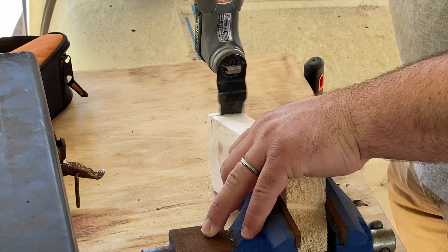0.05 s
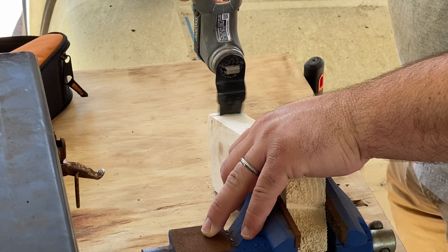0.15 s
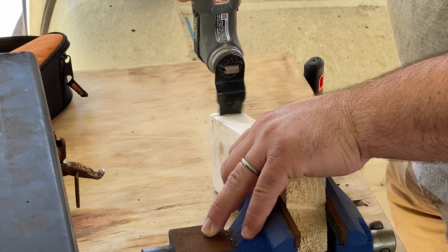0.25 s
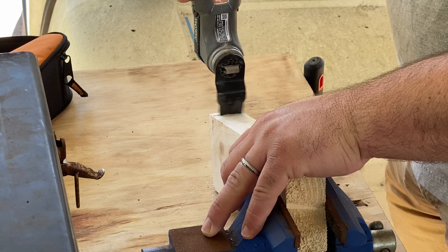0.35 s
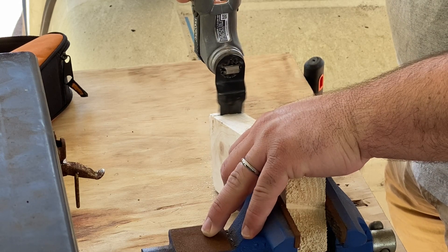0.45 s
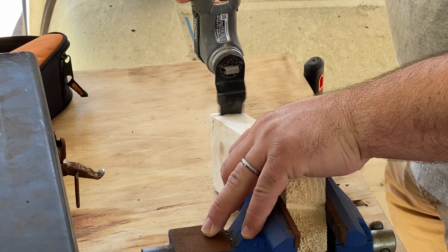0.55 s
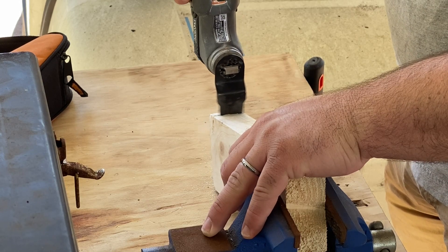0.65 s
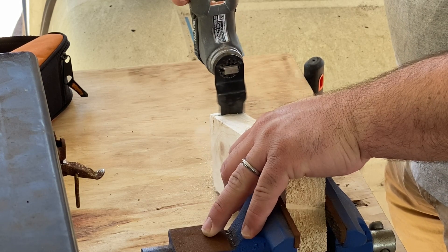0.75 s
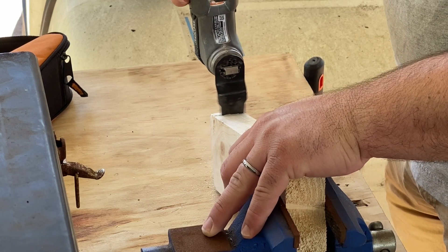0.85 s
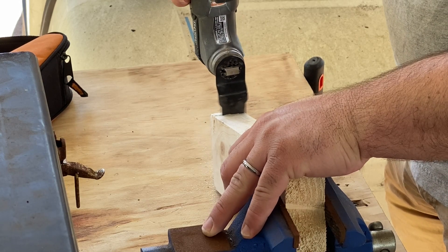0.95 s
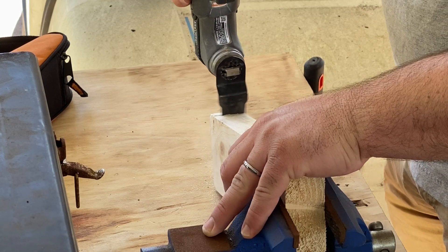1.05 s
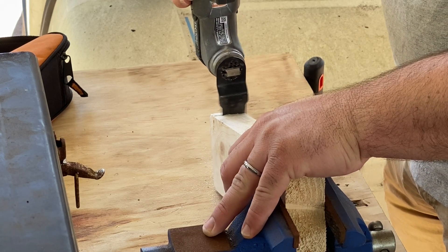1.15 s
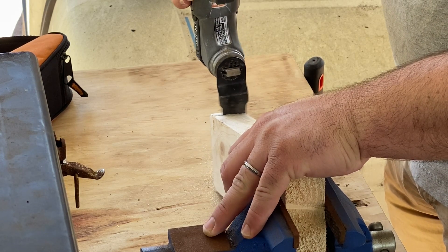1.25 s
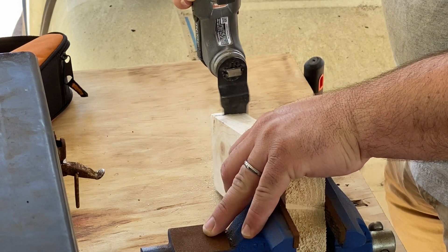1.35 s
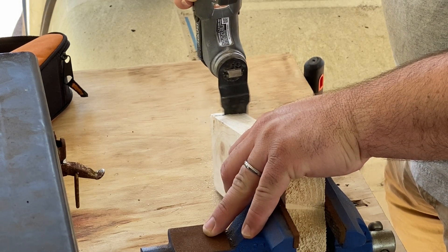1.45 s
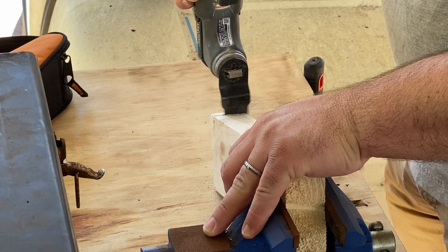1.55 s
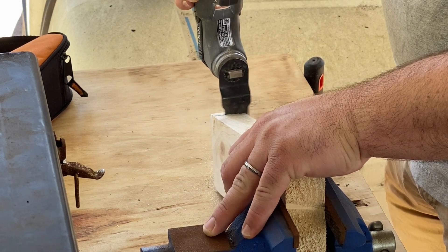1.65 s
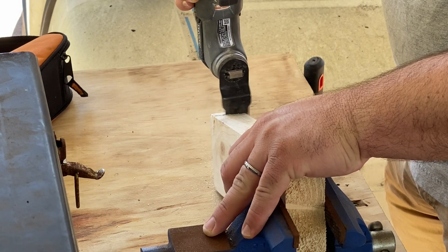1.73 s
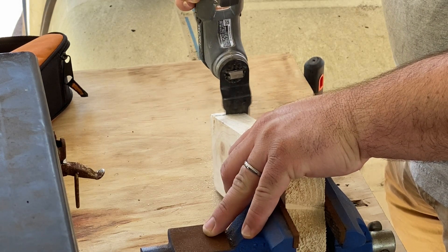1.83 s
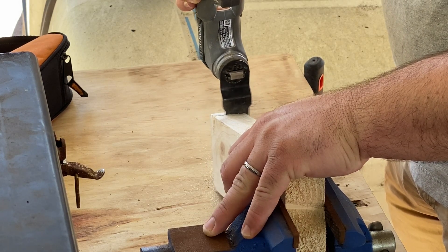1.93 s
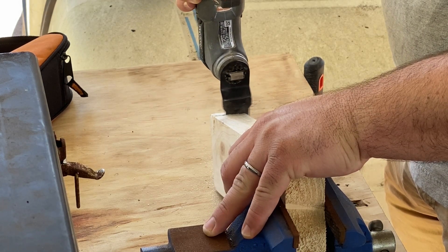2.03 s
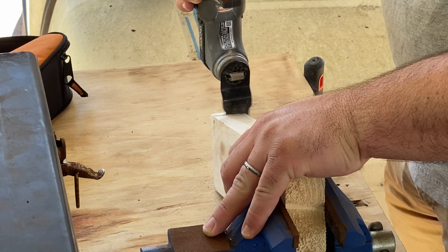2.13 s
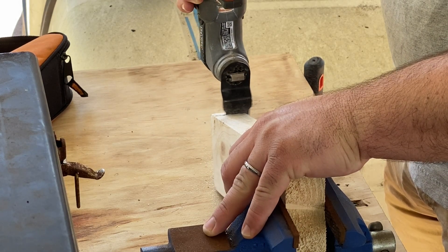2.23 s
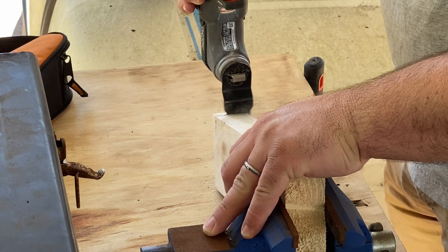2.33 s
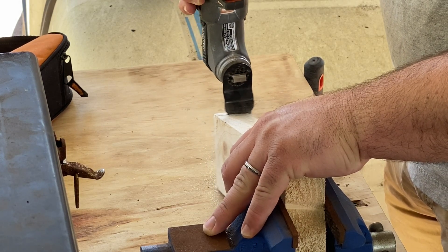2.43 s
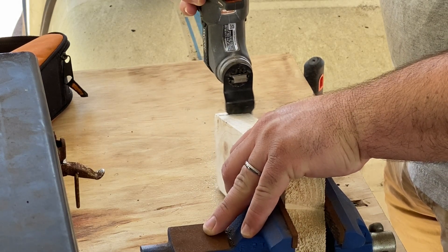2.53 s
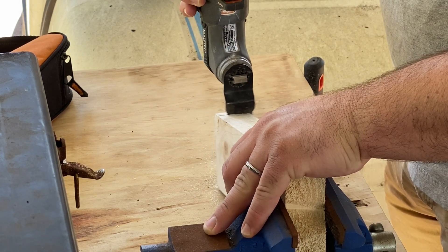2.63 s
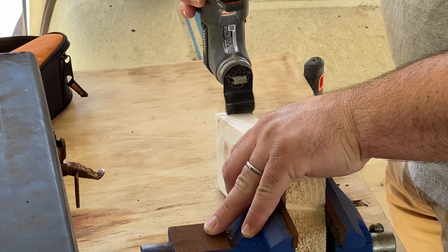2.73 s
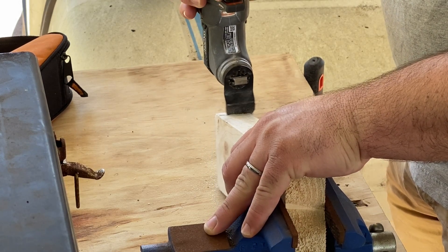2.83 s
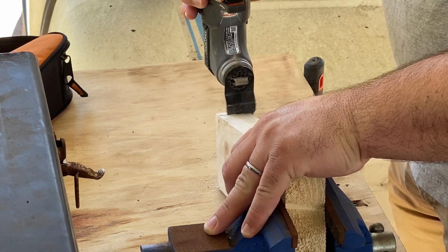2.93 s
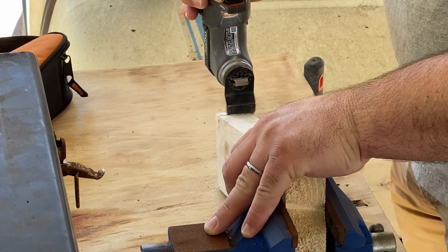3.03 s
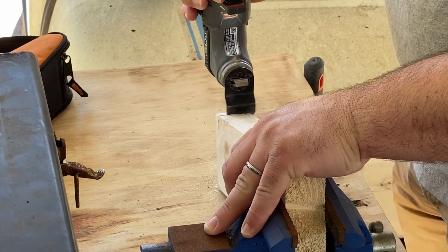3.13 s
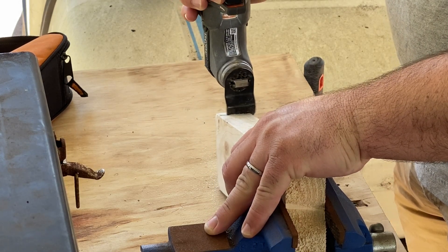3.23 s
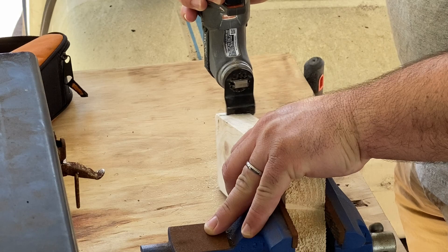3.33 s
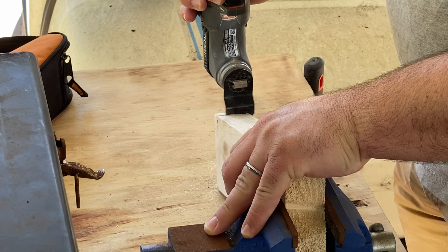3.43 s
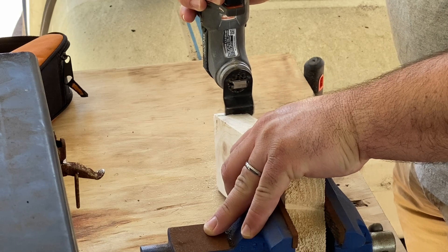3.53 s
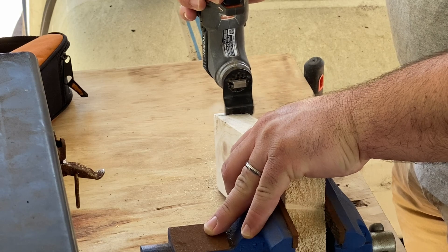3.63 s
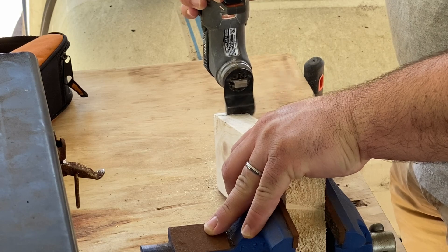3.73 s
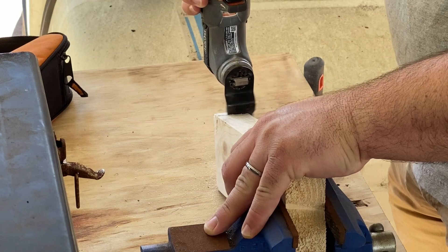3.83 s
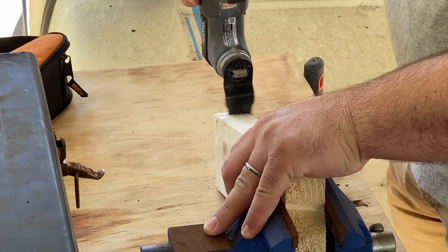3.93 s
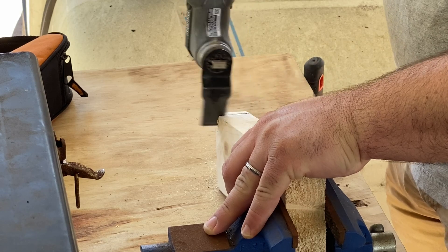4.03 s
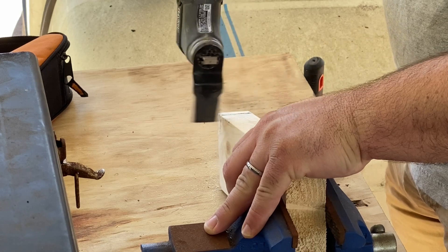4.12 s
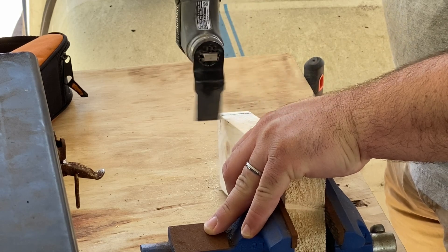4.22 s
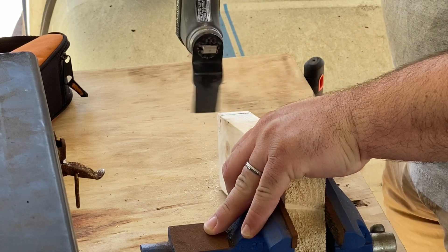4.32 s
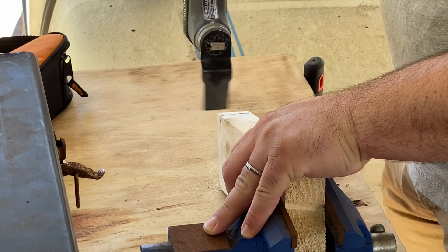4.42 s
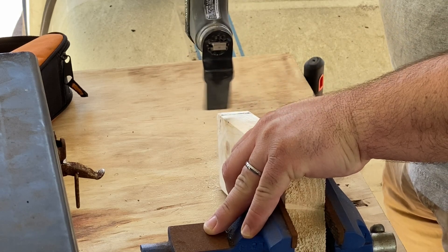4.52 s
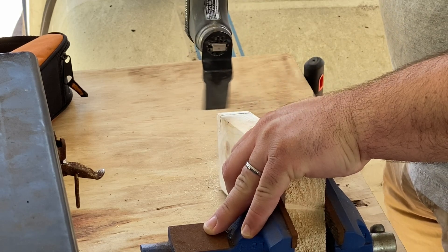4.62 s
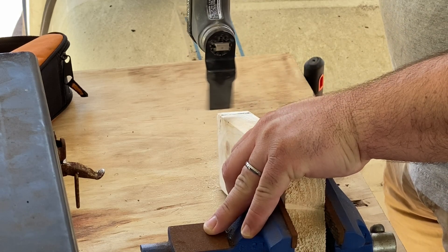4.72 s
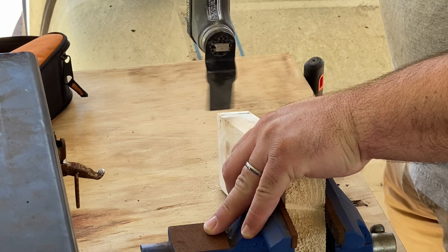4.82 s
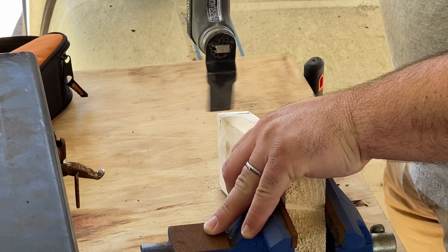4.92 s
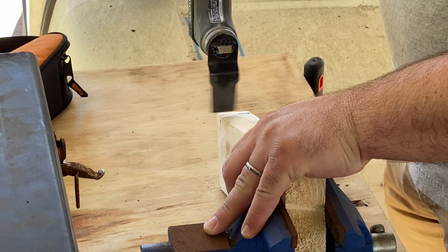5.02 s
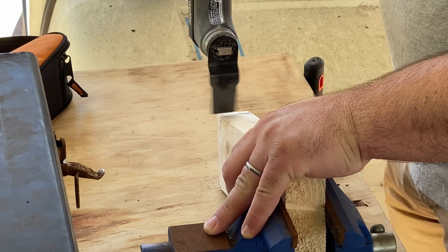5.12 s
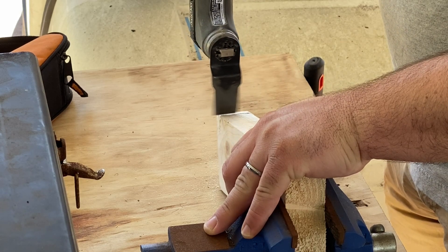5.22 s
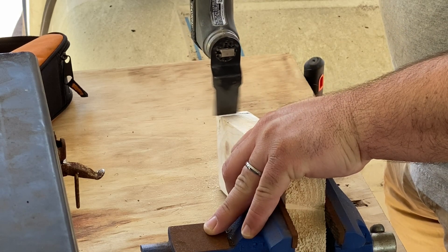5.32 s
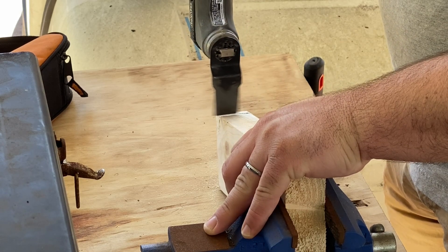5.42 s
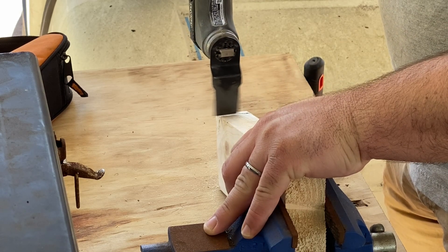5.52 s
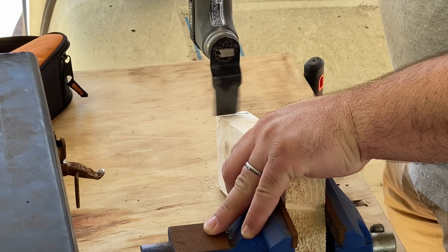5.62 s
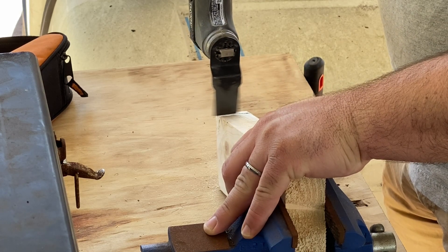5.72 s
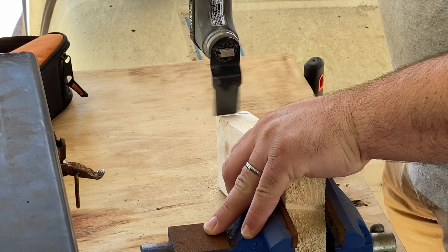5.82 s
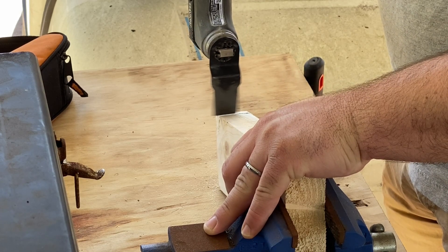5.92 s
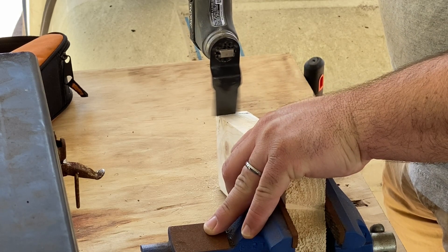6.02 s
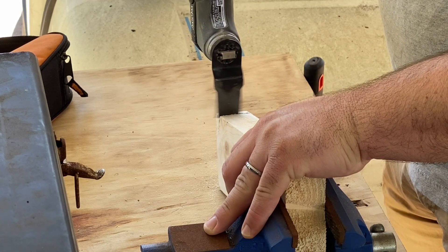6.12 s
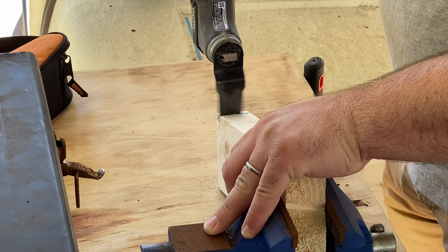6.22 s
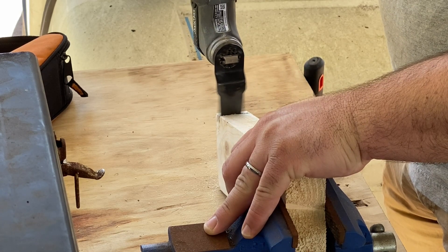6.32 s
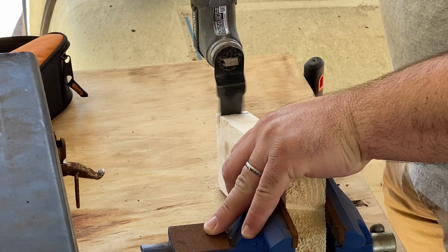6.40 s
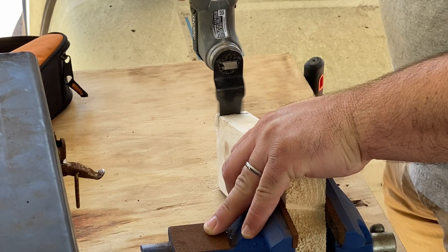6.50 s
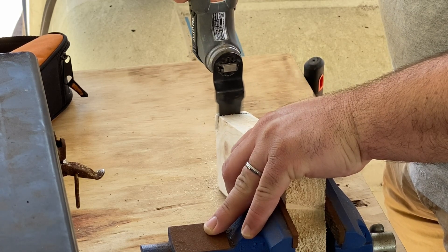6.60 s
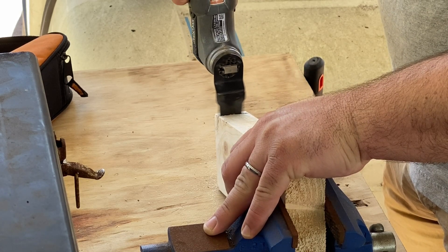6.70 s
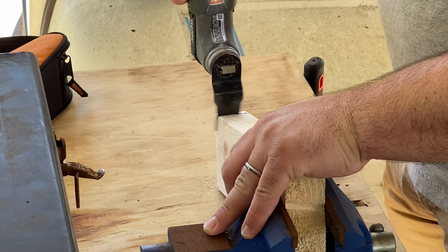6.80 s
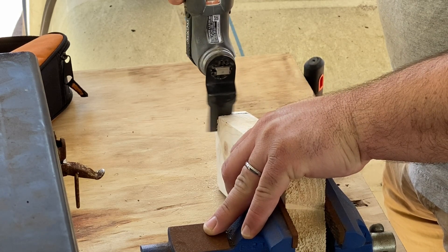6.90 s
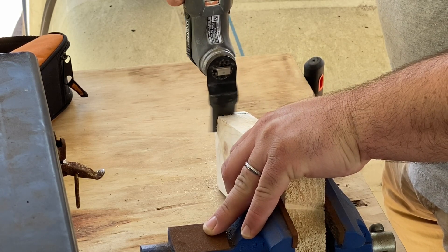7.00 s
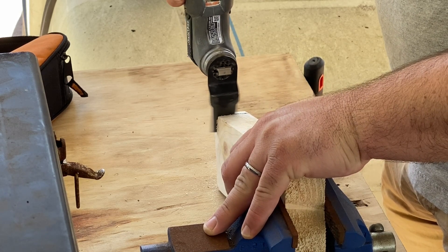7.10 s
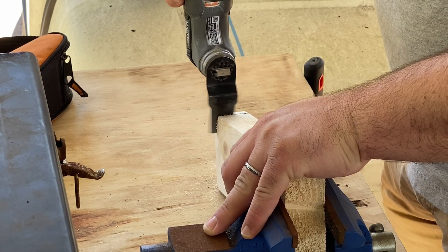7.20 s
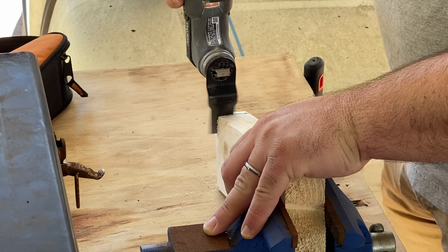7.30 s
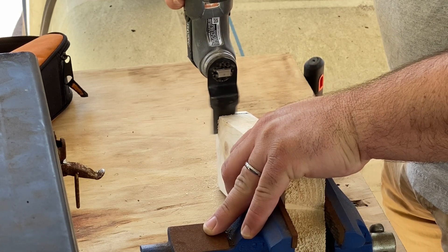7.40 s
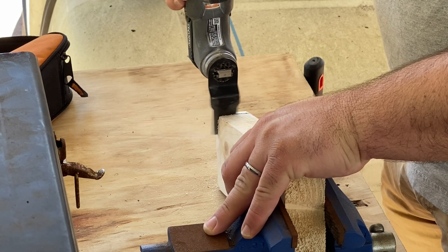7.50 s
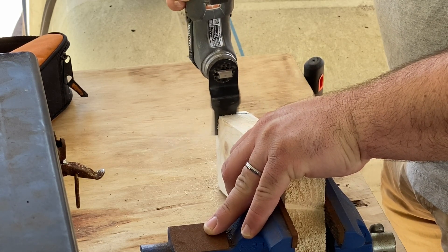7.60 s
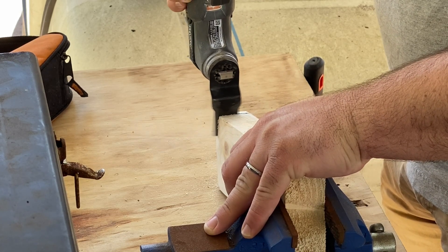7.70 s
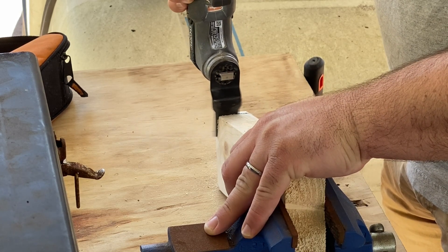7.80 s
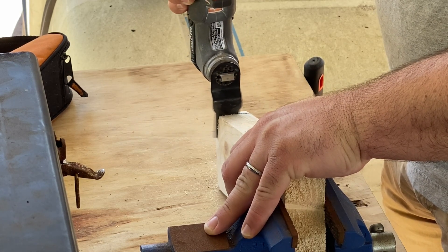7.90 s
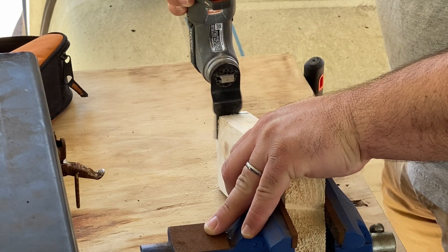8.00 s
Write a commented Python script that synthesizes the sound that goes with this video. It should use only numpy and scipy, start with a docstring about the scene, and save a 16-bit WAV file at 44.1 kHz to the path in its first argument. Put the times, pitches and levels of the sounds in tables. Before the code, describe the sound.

An oscillating power tool whines up and buzzes into a wood block, pulls out to run free, then cuts again.

```python
"""A corded oscillating multi-tool spins up and plunges into a wood block held in a vise on a bench.
The blade bites, sinks in, wedges and chatters, is pulled out, runs free and is set to the wood again.
Each stroke knocks out a bright buzz and rocks the block into a low hum; both sag in pitch under load.
The pinched blade squeals, the teeth rasp, the steel rings and the motor's fan hisses.
A short diffuse tail widens the noisy layers."""
import sys
import numpy as np
from scipy import signal
from scipy.fft import rfft, irfft, next_fast_len
from scipy.io import wavfile

SR = 44100
rng = np.random.default_rng(int(sys.argv[2]) if len(sys.argv) > 2 else 0)


def master_out(mix):
    """Clip the mix to full scale and print it as 16-bit PCM to the path in sys.argv[1]."""
    frames = np.transpose(np.atleast_2d(mix))
    ceiling = np.clip(frames, -1, 1)
    pcm = np.round(ceiling * 32767).astype(np.int16)
    wavfile.write(sys.argv[1], SR, pcm)


N = 355049
T = np.arange(N) / SR
FFT_SIZE = next_fast_len(N + 4096, True)
FREQS = np.arange(FFT_SIZE // 2 + 1) * SR / FFT_SIZE
MAINS_HZ = 60
MAINS_RIPPLE = np.sin(2 * np.pi * 2 * MAINS_HZ * T)  # two pushes on the motor per mains cycle
SIDES = np.array([[1], [-1]])  # left, right


# how hard the hand presses the blade into the wood: t/s, motor load/0-1
LOAD = [(0, .09), (.59, 0.23), (.69, .49), (.99, .635), (2.11, 0.72), (2.28, 0.95), (2.87, 0.94),
        (3.27, 0.86), (3.61, 0.6), (3.74, 0.27), (4.0, .23), (4.34, 0.06), (5.2, .1), (6.05, 0.05),
        (6.57, 0.22), (6.99, 0.06), (7.22, 0.15), (8.05, 0.46)]
def motor(start_hz=194.16, no_load_hz=321.46, sag_hz=49.89, inertia_s=.1):
    """Load, stroke rate and running stroke count: the rotor spins up and sags under load, with inertia."""
    load = np.clip(np.interp(T, *np.transpose(LOAD)), .01, 1)
    target_hz = no_load_hz - sag_hz * load
    pole = np.exp(-1 / (inertia_s * SR))
    hz = start_hz + signal.lfilter([1 - pole], [1, -pole], target_hz - start_hz)
    wobble = 1 + 0.001163 * wander(25) + 0.0014 * MAINS_RIPPLE
    return load, hz, np.cumsum(hz * wobble) / SR


# hand moves, each a crossfade centred on t; friction rides rasp and hiss, knock the buzz, rock the hum's
# fundamental, thrum its overtones; friction and rock drift as the kerf clogs or clears:
# t/s, fade/s, contact, blade engaged/0-1, friction/dB, knock/dB, rock/dB, thrum/dB, drift/(dB per s)
MOVES = [(0, .02, "biting", 0.81, 1, -2, 2, 8.5, 15.5), (.41, 0.21, "biting", 0.86, 0, 1, -6, -6, 11.5),
         (.66, 0.088, "biting", 0.87, 2, 1, 0, 2.5, -2), (.97, 0.23, "biting", 1, -1.5, -1, 2, -3.5, 3.5),
         (1.3, 0.36, "buried", 1, -0.2, 1, 1.5, 0, -2), (2.21, 0.065, "wedged", 0.98, 2, 0.5, 1.5, 0, 0),
         (2.88, 0.48, "wedged", 0.98, -4.5, -1, -4, -3, 1.5),
         (3.38, 0.19, "wedged", 1, -6, -1.5, -1.5, 2, 1.5),
         (3.72, 0.06, "biting", 0.78, -8, -13, -15, -7.5, -4.5),
         (4.33, 0.29, "free", 0, -0.5, 0.5, 4.5, 1.5, 0.5),
         (5.25, 0.055, "wedged", 0.19, -0.5, -1.5, 7.5, -0.5, -0.5),
         (6.05, 0.32, "free", 0, 2, 0.5, 6, -0.5, -8), (6.45, 0.31, "biting", 0.57, -4, -6.5, -2, -2, 0.5),
         (6.87, 0.082, "buried", 0.47, -2, -2, 2, -1, -1.5),
         (7.35, 0.17, "biting", 1, -6, -5.5, -6.5, -2, 3), (7.95, 0.39, "buried", 0.86, 0, 2, 4, -2, 10)]
# the teeth catch and jolt the block: t/s, half-width/s, knock/dB, rock/dB
CATCHES = [(3.95, 0.033, 4, 10), (4.08, .02, -2, 14), (5.373, 0.013, -2, 6), (6.629, 0.049, 2.5, 1),
           (6.913, 0.014, 1.5, 19)]
def hand(stutter_db=3, stutter_hz=22):
    """The hand sets the blend of contacts and four level rides in dB; a half-engaged blade stutters."""
    times, state = T[::64], None
    for t, fade_s, contact, engaged, friction_db, knock_db, rock_db, thrum_db, drift_rate in MOVES:
        drift = drift_rate * (times - t)
        blend = [engaged * (name == contact) + (1 - engaged) * (name == "free") for name in CONTACTS]
        rides = friction_db + drift, knock_db, rock_db + drift, thrum_db
        target = np.array(np.broadcast_arrays(*blend, *rides))
        crossfade = np.clip((times - t) / fade_s + .5, 0, 1)
        state = target if state is None else state + (target - state) * crossfade
    *blend, friction, knock, rock, thrum = (np.interp(T, times, row) for row in state)
    for t, half_width_s, knock_db, rock_db in CATCHES:
        jolt = swell(t, half_width_s)
        knock, rock = knock + knock_db * jolt, rock + rock_db * jolt
    blend = np.clip(blend, 0, 1)
    free = blend[0]
    stutter = stutter_db * 2 * np.sqrt(free * (1 - free)) * wander(stutter_hz)
    return blend, friction, knock, rock + stutter, thrum + stutter / 2


# buzz EQ, one curve per contact (free, biting, buried, wedged): f/Hz, level/dB
BUZZ_EQ = ([(1270, -11.5), (1590, -3.5), (1900, -0.5), (2220, -8.5), (2540, -7), (2860, 3), (3490, -14.5),
           (4120, -8), (4760, -6.5), (5710, 0.5), (6340, 6), (6980, -14), (7610, -2), (12690, -1)],
           [(1220, -4), (1530, -3.5), (1840, -3.5), (2140, -5), (2450, 3.5), (2750, -7.5), (3370, -3),
           (3980, -7), (4590, -3.5), (5510, -1), (6120, -2), (6730, -12.5), (7650, -3), (12240, -15)],
           [(1150, -0.5), (1440, 6), (1730, -3), (2020, -10), (2300, 3.5), (2590, 0), (3170, -3.5),
           (3750, -6), (4320, -3), (4900, -8), (5760, 2.5), (6630, -16.5), (7200, -7.5), (11520, -3)],
           [(1110, 0.5), (1380, 0.5), (1660, -6), (1940, 5.5), (2490, 5.5), (2770, -1), (3050, -5.5),
           (3880, -3), (4710, 0), (5260, -3), (5810, -13), (6370, -6.5), (7200, -1), (11070, -7)])
# play in the drive and grip, per contact: half-speed rattle level/dB, harmonic flutter/dB
LOOSENESS = [(-5.5, 2), (-15, 9), (-5.5, 1.5), (-9, 2.5)]
def stroke_buzz(strokes, stroke_hz, contact_blend, flutter_hz=12, full_rattle_hz=5000):
    """A knock on each stroke gives a tall harmonic stack; slack in the drive adds lines in between."""
    times, hz, blend = T[::256], stroke_hz[::256], contact_blend[:, ::256]
    rattle_db, flutter_db = np.transpose(LOOSENESS)
    stack, power, knock_phase = 0, 0, 0
    for order in np.arange(4, 44, .5):
        colour = sum(share * eq(curve, order * hz) ** 2 for share, curve in zip(blend, BUZZ_EQ))
        grip = np.minimum(wander(flutter_hz, times), 1)  # grip and pressure keep shifting
        gain = np.sqrt(colour + 1e-12) * undb(flutter_db @ blend * grip)
        if order % 1:  # a rattle line
            gain *= (undb(rattle_db) @ blend) * np.minimum(order * hz / full_rattle_hz, 1)
            phase = rng.uniform(0, 2 * np.pi)
        else:
            knock_phase += np.pi / 2 * rng.standard_normal()  # the housing spreads each knock in time
            phase = knock_phase
        stack += np.interp(T, times, gain) * np.cos(2 * np.pi * order * strokes + phase)
        if order < 26:  # these lines set the overall level
            power += gain ** 2 / 2
    throb = 1 + 0.055 * MAINS_RIPPLE
    roughness = undb(0.28 * wander(330))
    return stack / np.sqrt(np.interp(T, times, power)) * throb * roughness


def block_hum(strokes, hz, levels_db, flutter_db=0.46):
    """The blade's reaction rocks block and bench: low harmonics that sweep through the bench modes."""
    hum = 0
    for order, db in enumerate(levels_db, 1):
        gain = np.sqrt(2) * undb(db + order * flutter_db * wander(60)) * bench_gain(order * hz)
        hum += gain * np.sin(2 * np.pi * (order * strokes + rng.random()))
    return hum * (1 + 0.032 * MAINS_RIPPLE)


# under pinch or load, one mode of blade or block sings out: t/s, half-width/s, f/Hz, bandwidth/Hz, level/dB
SQUEALS = [(0.13, 0.018, 2320, 270, -22.5), (0.26, 0.099, 3800, 220, -32), (0.44, 0.12, 6000, 160, -30.5),
           (0.534, 0.066, 2830, 530, -32.5), (.52, .06, 6320, 300, -27), (1.35, 0.065, 6500, 600, -26.5),
           (2.53, 0.38, 2240, 450, -38), (2.6, 0.49, 4640, 270, -32), (2.6, 0.22, 5900, 400, -30),
           (3.34, 0.24, 4620, 170, -34.5), (3.526, 0.064, 1990, 150, -43), (3.52, 0.2, 2555, 190, -33.5),
           (3.56, 0.079, 7220, 350, -38), (4.36, 0.055, 10440, 140, -33.5), (5.807, .55, 6200, 299.1, -48),
           (5.62, 0.22, 477, 23, -53.5), (6.98, 0.061, 1267, 120, -49), (8.2, 0.079, 2380, 120, -45),
           (7.973, 0.13, 3340, 199.7, -37.5)]
def squeals(buzz, friction_db=-3):
    """Knocks and friction drive the modes; harmonics flare as they glide through a resonance."""
    force = rfft(buzz + undb(friction_db) * rng.standard_normal(N), FFT_SIZE)
    voices = 0
    for t, half_width_s, hz, width_hz, db in SQUEALS:
        ring = irfft(force * resonance(hz, width_hz) ** 2, FFT_SIZE)[:N]
        pinch = swell(t, half_width_s)
        ring_rms = np.sqrt(np.average(ring ** 2, weights=pinch))
        voices += undb(db) * pinch * ring / ring_rms
    return voices * (1 + 0.05 * MAINS_RIPPLE)


# rasp EQ, one curve per contact (free, biting, buried, wedged): f/Hz, level/dB
RASP_EQ = [
    [(60, -15), (130, -17.5), (400, -33), (850, -10), (1300, -14), (2200, -8), (3800, -12), (5500, -9.5),
     (6250, -1), (6900, -2.5), (7700, 0.5)],
    [(60, -12), (130, -7.5), (200, -4.5), (420, -11.5), (900, -6), (2400, -0.5), (3900, -3), (5000, 0),
     (6300, 0), (7800, 6.5)],
    [(60, -20), (130, -5), (190, 4), (330, -6), (750, -4), (1400, -3), (2400, 1), (3600, -4), (5500, 0),
     (7000, 1), (7800, 4.5)],
    [(60, -24), (130, -12), (200, -4), (340, -6), (520, -7), (1550, -6.5), (2400, -3.5), (3050, -8.5),
     (4200, -5.5), (4650, -4), (5150, 1), (5800, 1), (6500, -7), (7400, -2)],
]
def tooth_rasp(strokes, blend, low_hz=60, top_hz=8200, body_hz=700):
    """Teeth tear fibres and the gear rubs; kerf, block and bench colour the noise."""
    low_cut = FREQS ** 3 / (FREQS ** 3 + low_hz ** 3)
    high_cut = 1 / (1 + (FREQS / top_hz) ** 16)
    tone = low_cut * high_cut * bench_gain(FREQS)
    grit = sum(np.sqrt(share) * noise(eq(curve, FREQS) * tone) for share, curve in zip(blend, RASP_EQ))
    body = filtered(grit, 1 / (1 + (FREQS / body_hz) ** 4))  # low resonances ring through the strokes
    return body + (grit - body) * stroke_pulse(strokes, depth=0.069, uneven_db=0)


# ring of the steel per contact (free, biting, buried, wedged): level/dB against the hiss
RING_LEVELS = [-22, -22, -11, -9]
def blade_ring(blend, hz=10350, width_hz=65, flicker_db=3):
    """The thin steel blade sings where the kerf rubs it."""
    ring = noise(resonance(hz, width_hz))
    return ring * (undb(RING_LEVELS) @ blend) * undb(flicker_db * wander(24.45))


# the blade kicks, jams or clips the block's edge: t/s, half-width/s, scrape level/dB, thump level/dB
KICKS = [(0.021, 0.0084, -44, -30), (2.262, 0.019, -37, -33.5), (2.829, .025, -42, -36),
         (4.093, .004, -28.5, -50), (4.102, 0.0056, -51, -33), (4.175, 0.0093, -24.5, -46),
         (4.201, 0.0062, -34, -42), (5.24, 0.018, -36, -54), (6.912, 0.0076, -30, -46)]
# EQ of the bright scrape and of the dull thump: f/Hz, level/dB
SCRAPE_EQ = [(300, -15), (900, -4), (1500, -3), (2800, 4), (4500, 1), (7500, 5), (9500, -10), (15000, -19)]
THUMP_EQ = [(50, -31), (130, -5), (220, -1), (400, -12), (1000, -9), (3000, -41)]
def blade_kicks(strokes):
    """Brief hits of blade on wood, each a scrape layered with a thump."""
    scrape = noise(eq(SCRAPE_EQ, FREQS)) * stroke_pulse(strokes, depth=0.39, uneven_db=0.5)
    thump = noise(eq(THUMP_EQ, FREQS))
    return sum(swell(t, half_width_s) * (undb(scrape_db) * scrape + undb(thump_db) * thump)
               for t, half_width_s, scrape_db, thump_db in KICKS)


# airy top end of fan and dust: f/Hz, level/dB
HISS_EQ = [(6500, -31), (8200, -4.5), (10000, -2), (11500, -4.5), (13000, -4.5), (15500, -2.5)]
def fan_hiss(strokes):
    """Air from the fan and the spray of dust hiss, pulsing lightly with the strokes."""
    low_cut = FREQS > HISS_EQ[0][0]
    return noise(eq(HISS_EQ, FREQS) * low_cut) * stroke_pulse(strokes, depth=0.066, uneven_db=1.25)


# modes of bench and vise: f/Hz, bandwidth/Hz, level/dB against the sound driving them
BENCH_MODES = [(126.4, 4.2, 8.5), (193.5, 15, 6), (483, 10, 9)]
def bench_gain(hz):
    """Lift that the resonating bench and vise give to each frequency."""
    modes = (undb(db) * resonance(mode_hz, width_hz) for mode_hz, width_hz, db in BENCH_MODES)
    power = 1 + sum(abs(mode) ** 2 for mode in modes)
    return np.interp(hz, FREQS, np.sqrt(power))


# EQ of the stereo width of the rasp and hiss, wide in the low mids and top treble, mono from 2 to 8 kHz:
# f/Hz, side level/dB against the centre
WIDTH_EQ = [(100, -25), (330, -6.5), (600, -7), (1300, -1), (2100, -35), (7500, -99), (9000, -2.5),
            (15000, -10.5)]
def stereo_width(x, t60_s=0.088):
    """A short diffuse tail, used as a side signal to spread the noisy layers."""
    tail = rng.standard_normal(N) * np.exp(-np.log(1000) * T / t60_s)
    smear = np.exp(1j * np.angle(rfft(tail, FFT_SIZE)))
    return filtered(x, smear * eq(WIDTH_EQ, FREQS))


def stroke_pulse(strokes, depth, uneven_db):
    """Envelope of friction that swells once a stroke, with optional random roughness."""
    return unit((1 + depth * np.cos(2 * np.pi * strokes)) * undb(uneven_db * wander(400)))


def swell(t, half_width_s):
    """Bell-shaped envelope peaking at time t."""
    return np.exp(-.5 * ((T - t) / half_width_s) ** 2)


def wander(rate_hz, times=T):
    """Random modulator with a spread near 1."""
    return 1.2 * np.interp(times * rate_hz, np.arange(4096), rng.standard_normal(4096))


def resonance(hz, width_hz):
    """Response of one mode, gain 1 at its centre."""
    return 1j * FREQS * width_hz / (hz ** 2 - FREQS ** 2 + 1j * FREQS * width_hz)


def eq(curve, hz):
    """Gain of an EQ curve at the given frequencies."""
    f, db = np.transpose(curve)
    return undb(np.interp(np.log(hz + 1), np.log(f), db))


def filtered(x, gain):
    """Apply a gain given at every frequency."""
    return irfft(rfft(x, FFT_SIZE) * gain, FFT_SIZE)[..., :N]


def noise(gain):
    """Coloured noise of rms 1."""
    return unit(filtered(rng.standard_normal(N), gain))


def undb(db):
    """Decibels to gain."""
    return 10 ** (np.asarray(db) / 20)


def unit(x):
    """Scale to rms 1."""
    return x / np.sqrt(np.mean(x ** 2))


# base mix per contact (free, biting, buried, wedged), before the hand's rides:
# buzz/dB, rasp/dB, hiss and ring/dB, hum fundamental at full load/dB, 2nd harmonic/dB, 3rd harmonic/dB
CONTACTS = {"free": (-35, -35, -31, -39.5, -62.5, -44.5),
            "biting": (-25.5, -25.5, -20.5, -11.5, -40.5, -37),
            "buried": (-30, -27, -26, -13.5, -32.5, -47),
            "wedged": (-26.5, -24.5, -25.5, -19.5, -37, -35.5)}
def scene(feed_wobble_db=0.84, rock_exponent=1.18):
    """The tool works close up, fed a little unevenly; the block rocks harder as the load grows."""
    load, hz, strokes = motor()
    blend, friction_db, knock_db, rock_db, thrum_db = hand()
    base_mix = np.transpose(list(CONTACTS.values())) @ blend
    buzz_db, rasp_db, air_db, first_db, second_db, third_db = base_mix
    load_db = rock_exponent * 20 * np.log10(load)
    hum_db = first_db + rock_db + load_db, second_db + thrum_db, third_db + thrum_db
    buzz = stroke_buzz(strokes, hz, blend)
    hum = block_hum(strokes, hz, hum_db)
    buzz_gain = undb(buzz_db + knock_db + feed_wobble_db * wander(16))
    tones = hum + buzz_gain * buzz + squeals(buzz)
    rasp = undb(rasp_db) * tooth_rasp(strokes, blend)
    air = undb(air_db) * (fan_hiss(strokes) + blade_ring(blend))
    friction = undb(friction_db) * (rasp + air) + blade_kicks(strokes)
    return tones + friction + SIDES * stereo_width(friction)


# stereo balance, left minus right: f/Hz, level/dB
BALANCE = [(60, 1), (250, 2.2), (400, 1.8), (700, -.5), (1300, .5), (2400, 0)]
# lead of the left microphone port over the right: f/Hz, phase/rad
PORT_PHASE = [(300, 0), (600, -.4), (900, 0), (8000, 0), (8300, 2.9), (9500, 4.1), (10600, 6.1),
              (11900, 6.4), (12800, 9.1), (14100, 9.7), (15100, 12.3)]
def record(dry, top_hz=15750, fade_s=.005):
    """Two microphone ports: the high treble reaches the right one later; the top is cut."""
    phase_shift = np.exp(.5j * SIDES * np.interp(FREQS, *np.transpose(PORT_PHASE)))
    ports = filtered(dry, eq(BALANCE, FREQS) ** (SIDES / 2) * phase_shift)
    fade_out = np.minimum((T[-1] - T) / fade_s, 1)
    high_cut = signal.ellip(12, .1, 80, top_hz, fs=SR, output="sos")
    return signal.sosfilt(high_cut, ports * fade_out)


dry = scene()
out = record(dry)
master_out(out)
```